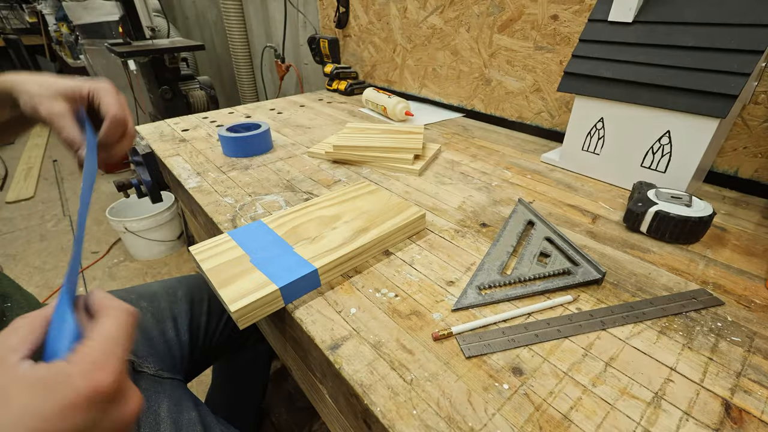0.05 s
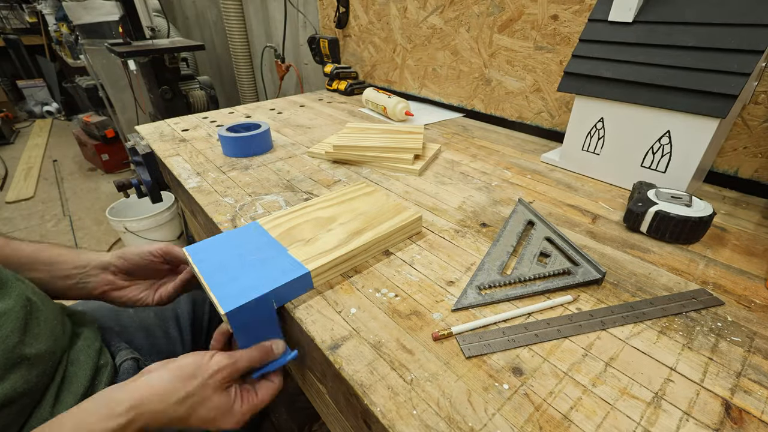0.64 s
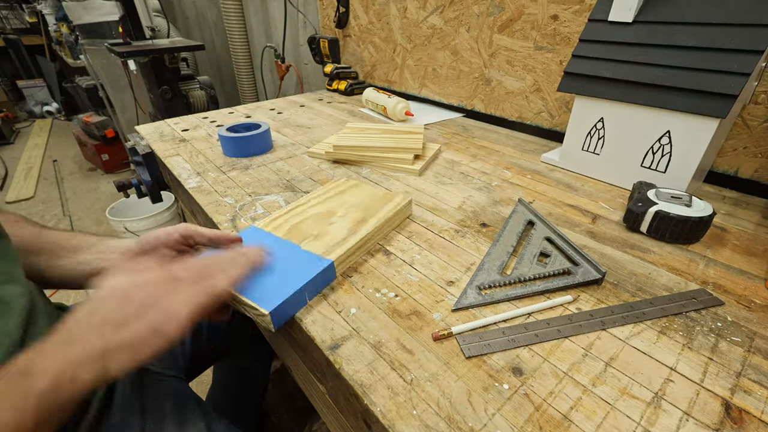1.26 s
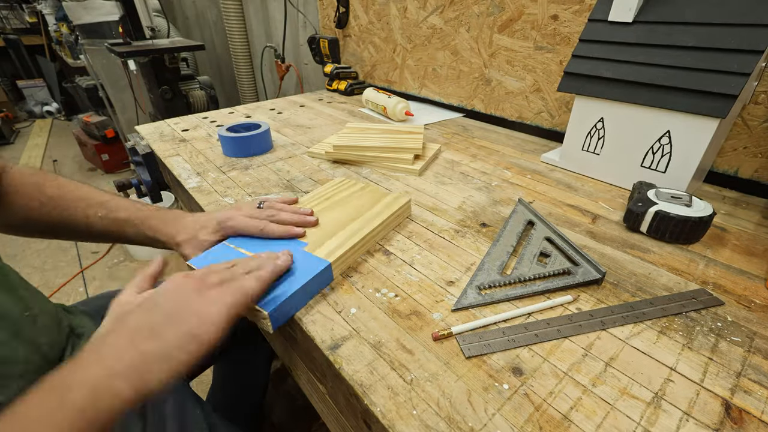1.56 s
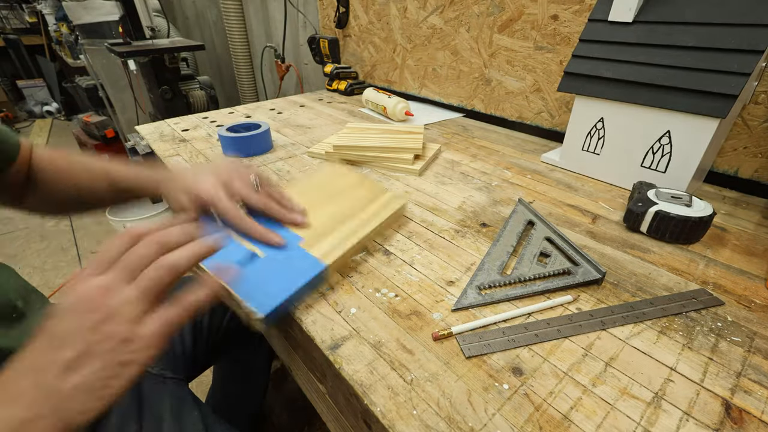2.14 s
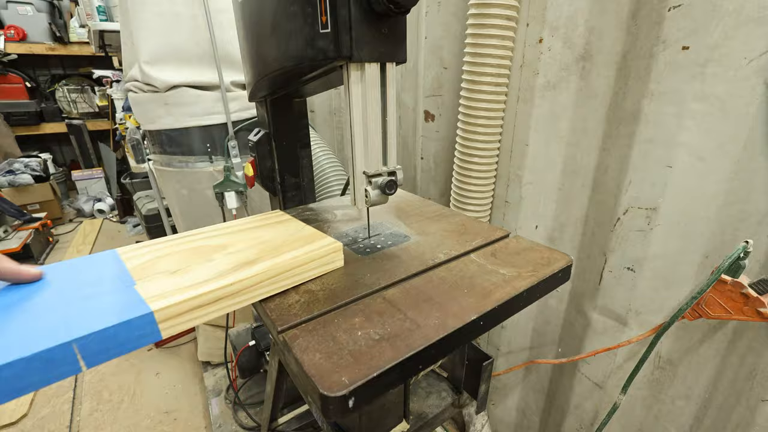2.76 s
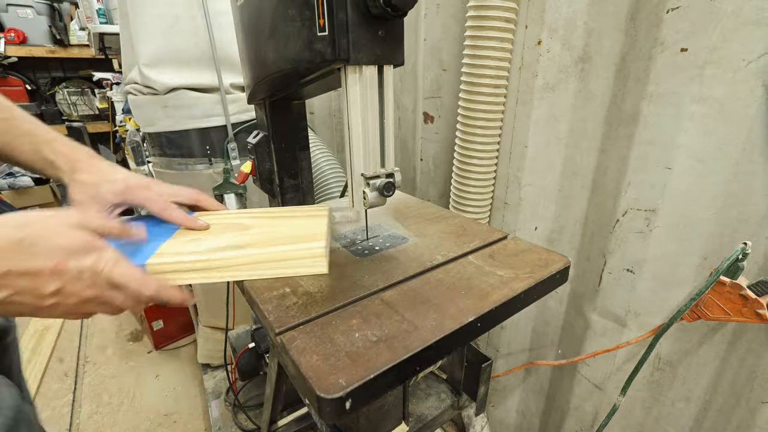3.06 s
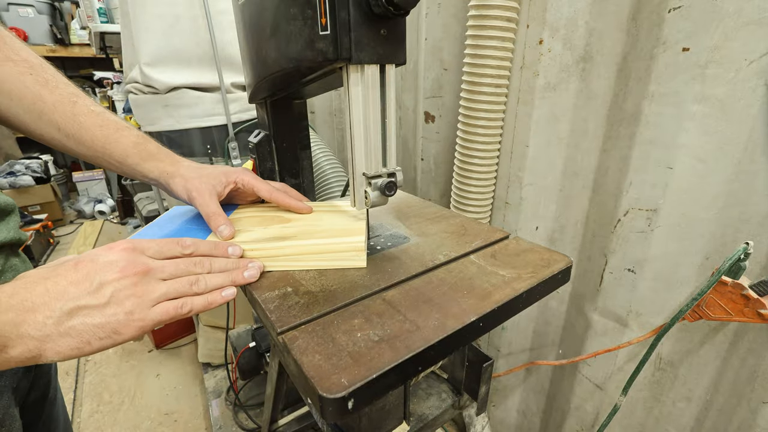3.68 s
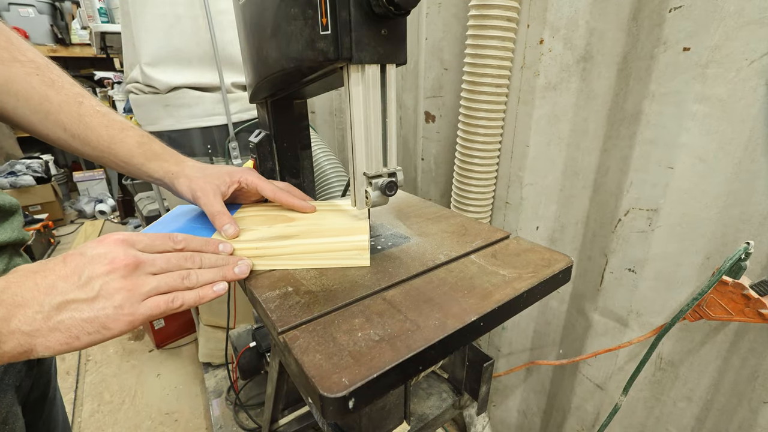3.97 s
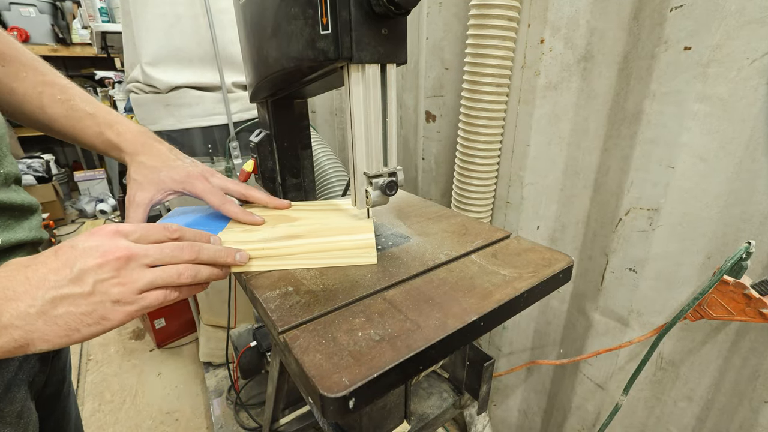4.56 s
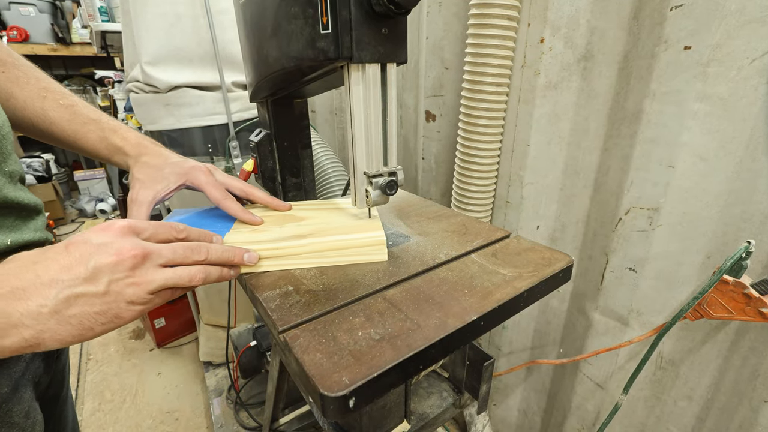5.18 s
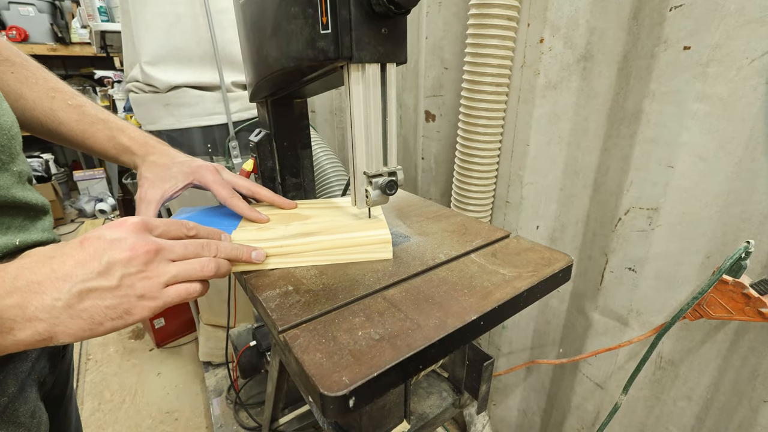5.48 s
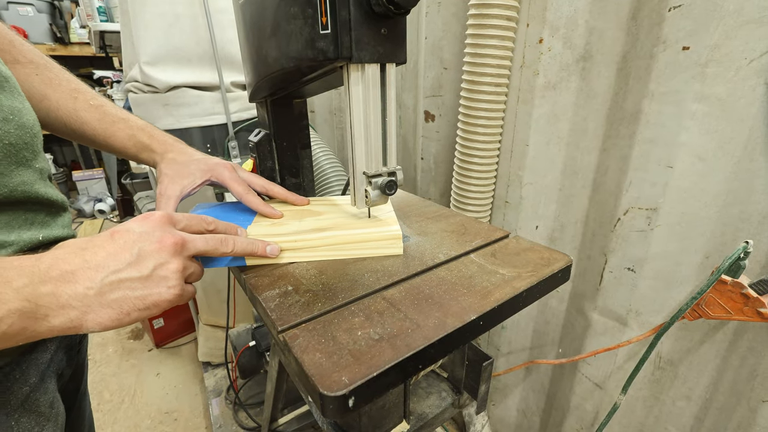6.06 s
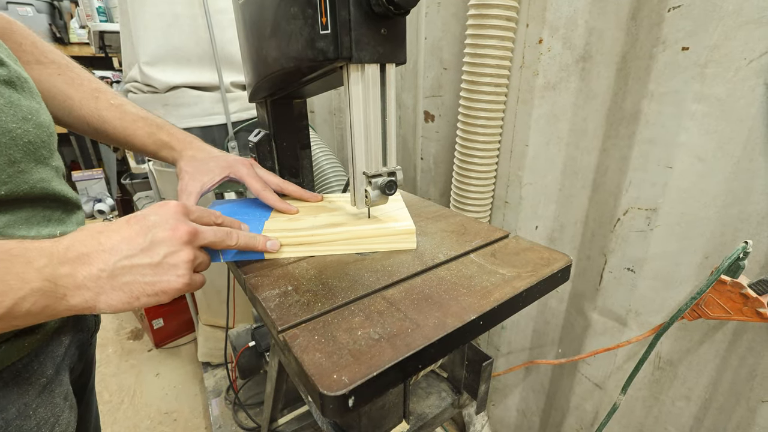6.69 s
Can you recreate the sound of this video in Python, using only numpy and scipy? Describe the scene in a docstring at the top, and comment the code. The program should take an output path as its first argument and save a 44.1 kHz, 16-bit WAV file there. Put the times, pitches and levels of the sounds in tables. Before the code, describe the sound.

Tape rustles and boards knock and scrape on a workbench before a bandsaw bites in with a raspy, metallic ring.

```python
"""In a small workshop, fingers smooth masking tape onto a stack of pine boards, which knocks and
slides on a workbench. Then the stack is pushed into a running bandsaw. The teeth chip the wood,
dust hisses and the saw table rumbles. The steel blade rings, and now and then it squeals as it
sticks in the cut. The room adds short echoes."""
import sys
import numpy as np
from scipy import signal
from scipy.fft import rfft, irfft, next_fast_len
from scipy.io import wavfile
from scipy.ndimage import uniform_filter1d, map_coordinates

SR = 44100
rng = np.random.default_rng(int(sys.argv[2]) if len(sys.argv) > 2 else 0)


def to_wav(s):
    """Save 16-bit WAV."""
    ch = np.atleast_2d(s).T  # columns
    pcm = np.round(np.clip(ch, -1, 1) * 32767)  # PCM
    wavfile.write(sys.argv[1], SR, pcm.astype(np.int16))


N = 301203
TIME = np.arange(N) / SR
AT_SAW_S, CUT_START_S, MID_CUT_S = 2.72, 2.972, 4.7


def from_db(db):
    """Turn decibels into a number to multiply by."""
    return np.exp(np.asarray(db) * (np.log(10) / 20))


def rms_one(x):
    """Scale a sound to an average power of 1."""
    return x / np.sqrt(np.mean(x ** 2) + 1e-20)


def at_hz(points, hz):
    """Read a table between its listed frequencies."""
    listed_hz, value = np.transpose(points)
    return np.interp(np.log(np.maximum(hz, 1)), np.log(listed_hz), value)


def coloured(x, colour):
    """Make some frequencies louder and others softer, at a total power of 1."""
    size = next_fast_len(N)
    gains = from_db(at_hz(colour, np.arange(size // 2 + 1) * SR / size))
    return rms_one(irfft(rfft(x, size) * gains, size)[:N])


def passed(x, hz, kind, order=2):
    """Keep the lows, the highs or a band of a sound."""
    return signal.sosfilt(signal.butter(order, np.clip(hz, 10, .45 * SR), kind, fs=SR, output="sos"), x)


def drift(per_s):
    """A random curve that wanders around zero."""
    points = rng.standard_normal(int(N / SR * per_s) + 3)
    return rms_one(np.interp(TIME * per_s, np.arange(len(points)), points))


def ring(x, hz, width):
    """Let x set one tone ringing; a smaller width (Hz) rings longer."""
    fade, turn = np.exp(-np.pi * width / SR), 2 * np.pi * hz / SR
    return signal.lfilter([0, np.sin(turn)], [1, -2 * fade * np.cos(turn), fade * fade], x + 1e-18)


def grains(per_s, spread_db):
    """Tiny random breaks or slips, as clicks of uneven size."""
    sizes = from_db(spread_db * np.minimum(rng.exponential(1, N), 4)) * rng.choice([-1, 1], N)
    return rms_one(sizes * (rng.random(N) < per_s / SR))


def contact(decay_s, size=8000):
    """A blow crushes wood fibres in a short burst of noise."""
    return rng.standard_normal(size) * np.exp(-np.arange(size) / (SR * decay_s))


def add(out, s, db, sound):
    """Place a blow so that its loudest 3 ms have the given level."""
    at = max(round(s * SR), 0)
    loudest = np.sqrt(uniform_filter1d(sound ** 2, size=132).max())
    out[at:at + len(sound)] += (from_db(db) * sound / loudest)[:N - at]


def onset(start_s, rise_s):
    """Rise from silence to 1."""
    return np.clip((TIME - start_s) / rise_s, 0, 1)


def gesture(start_s, length_s, db, rise_share=.19, sag_db_per_s=70, release_db_per_s=430):
    """Loudness of one rub or slide: it takes hold, eases off and lets go."""
    age = np.maximum(TIME - start_s, 0)
    level_db = db - sag_db_per_s * age - release_db_per_s * np.maximum(age - length_s, 0)
    return onset(start_s, rise_share * length_s) * from_db(np.maximum(level_db, -200))


def during_cut(rows):
    """A loudness curve that opens when the teeth meet the wood."""
    return from_db(np.interp(TIME, *np.transpose(rows))) * onset(CUT_START_S, 0.0027)


def swelling(peak_s, length_s, db):
    """Loudness that builds and dies away; its length is counted at half height."""
    return from_db(db) * .5 ** np.minimum((2 * (TIME - peak_s) / length_s) ** 2, 40)


def sustained(hz, width, even_s=0.15):
    """Uneven strokes keep a saw tone ringing: it flutters but holds its average level."""
    start = int(AT_SAW_S * SR)
    tone = ring(ring(rng.standard_normal(N - start), hz, width), hz, width * 6)
    level = np.sqrt(np.abs(uniform_filter1d(tone ** 2, int(even_s * SR))) + 1e-9)
    return np.pad(tone / level, (start, 0))


def background():
    """Still air and electric hum at the bench give way to the swish of the running blade."""
    # hum of the power supply: (frequency [Hz], level [dB])
    hum_tones = [(301.0, -66), (453.5, -65), (908.0, -67.5)]
    # tone colours of the air and the free-running blade: (frequency [Hz], level [dB])
    air_colour = [(18, -98), (30, -61), (240, -18), (296, -22), (404, -14), (448, -7.5), (597, -15.5),
                  (928, -20), (1000, -24), (2920, -21.5), (15000, -46)]
    idle_colour = [(100, -39), (400, -13), (1200, -6.5), (3000, -6.5), (6000, -11), (15000, -17)]
    at_saw = onset(AT_SAW_S, 0.056)
    hum = sum(from_db(db - 3) * np.sin(2 * np.pi * hz * TIME) for hz, db in hum_tones)
    hum *= from_db(2 * drift(6))
    air = from_db(-62.5) * coloured(rng.standard_normal(N), air_colour)
    idle = from_db(-58) * coloured(rng.standard_normal(N), idle_colour)
    return (1 - at_saw) * (hum + air) + at_saw * idle


def tape_strokes():
    """Skin sticks and slips on crinkly tape, in clumps of tiny clicks that make the boards ring."""
    # finger strokes: (start [s], length [s], level [dB])
    strokes = [(0.0, 0.06, -52), (0.04, .085, -42.5), (0.12, 0.13, -49.5), (0.632, 0.041, -60),
               (0.752, .06, -63), (0.87, 0.026, -56), (1.01, .07, -62), (1.106, 0.033, -49.5),
               (1.172, 0.12, -55), (1.32, 0.019, -48), (1.364, .04, -43), (1.425, 0.051, -47),
               (1.56, 0.21, -50.5), (1.917, 0.052, -47.5), (2.022, 0.09, -44.5), (2.132, 0.035, -45),
               (2.2, 0.028, -30), (2.78, .17, -61)]
    # tone colour of skin on tape: (frequency [Hz], level [dB])
    rustle = [(80, -37), (300, -12), (1200, -10.5), (1800, 1.5), (4000, -3.5), (8000, 1.5), (12000, 0),
              (15500, 2.5)]
    crinkle = rms_one(from_db(4.5 * np.tanh(drift(60))))
    crackles = from_db(-8) * grains(200, spread_db=2.5)
    skin = coloured(grains(4500, spread_db=3) * crinkle + crackles, rustle)
    boards = from_db(-15) * rms_one(ring(skin, 1830, 40))
    pressure = sum(gesture(*row, rise_share=.3, sag_db_per_s=44, release_db_per_s=400) for row in strokes)
    return from_db(2) * pressure * (skin + boards)


def snaps(creak_samples=400):
    """Tape, fingernails and wood edges creak briefly as they start to give, then click."""
    # sharp clicks: (time [s], level [dB], centre frequency [Hz])
    clicks = [(0.236, -34, 5540), (0.3098, -40.5, 11000), (0.7164, -28.5, 3220), (0.8599, -29, 8750),
              (0.9973, -41.5, 2510), (1.091, -20, 13000), (1.372, -34, 13600), (1.4693, -30.5, 3620),
              (1.517, -9.5, 8500), (1.919, -33.5, 4630), (2.006, -30.5, 2680), (2.2748, -9.5, 6340),
              (2.2958, -15, 2940), (2.468, -24, 6840), (2.5428, -24.5, 7130), (2.9117, -32, 2990),
              (2.9799, -13.5, 4200)]
    out = np.zeros(N)
    for s, db, hz in clicks:
        creak = rng.standard_normal(creak_samples) * np.linspace(0, 1, creak_samples)
        click = np.concatenate([from_db(-19 - (db + 20) / 2) * creak, contact(0.0014)])
        tone = passed(click, [hz * 0.44, hz * 1.4], "band", order=1)
        body = from_db(-12) * passed(click, 740, "high")
        add(out, s - creak_samples / SR, db, tone + body)
    return out


def knocks():
    """The stack hits bench or saw table: a thud whose pitch depends on the grip, a crack and a ring."""
    # knocks: (time [s], level [dB], thud pitch [Hz], hardness [dB])
    hits = [(0.717, -37, 490, -7), (0.873, -29, 583, -2), (1, -27.5, 510, -1), (1.124, -32, 630, 8),
            (1.211, -37, 530, -15), (1.224, -29.5, 603, -12), (1.257, -27, 517, -9),
            (1.296, -31.5, 480, -19), (1.319, -37, 550, -24), (1.361, -25.5, 590, 2), (1.4, -23.5, 573, -3),
            (1.438, -24, 583, 2), (1.506, -23, 552, -9), (1.585, -21.5, 970, 9), (1.968, -31.5, 653, -4),
            (2.01, -23.5, 495, 15), (2.207, -30.5, 550, -28), (2.244, -28.5, 533, 6),
            (2.273, -23.5, 577, 9), (2.299, -17, 526, 11), (2.344, -25, 1050, 11), (2.398, -14, 815, -7),
            (2.46, -33, 850, 9), (2.723, -36, 820, -36), (2.798, -41, 494, -24), (2.878, -36, 625, -2),
            (2.905, -21, 1210, -8)]
    # ringing tones of the stack: (frequency [Hz], level [dB], time to fade by 60 dB [s])
    wood_tones = [(529, -1.5, 0.079), (996, -2, 0.12), (1310, 5.5, 0.044), (1594, -7, 0.059),
                  (1823, -0.5, 0.21), (2322, -11, 0.12), (2800, -4, 0.031)]
    out = np.zeros(N)
    for s, db, thud_hz, hardness in hits:
        blow = contact(.0015)
        push = passed(signal.unit_impulse(len(blow)), 2250, "low")
        thud = passed(ring(push, thud_hz, width=80), .65 * thud_hz, "high", order=4)
        crack = passed(contact(0.0069), [650, 2400], "band", order=3)
        grip = 1 + .012 * rng.standard_normal(len(wood_tones))
        wood = sum(from_db(level) * ring(blow, hz * shift, np.log(1000) / (np.pi * fade_s))
                   for (hz, level, fade_s), shift in zip(wood_tones, grip))
        clack = rms_one(passed(wood, 340, "high", order=4)) + from_db(-0.5) * rms_one(crack)
        add(out, s, db, rms_one(thud) + from_db(-1 + 0.36 * hardness) * clack)
    return out


def bumps():
    """The heavy bench top answers a push with a dull bump."""
    # pushes on the bench: (time [s], level [dB])
    pushes = [(1.361, -71), (1.512, -62), (2.273, -43.5), (2.461, -58)]
    bump = passed(passed(signal.unit_impulse(8000), 130, "low"), 25, "high", order=1)
    out = np.zeros(N)
    for s, db in pushes:
        add(out, s, db, bump)
    return out


def slides():
    """Wood sticks and slips on wood, so the stack scrapes and rings; once, an edge rasps."""
    # slides on the bench: (start [s], length [s], level [dB])
    moves = [(1.524, 0.05, -27.5), (1.697, 0.0096, -51), (2.287, 0.07, -22.5), (2.39, 0.017, -30),
             (2.45, .03, -35.5), (2.558, 0.027, -33.5), (2.899, .06, -41)]
    # tone colour of wood on wood: (frequency [Hz], level [dB])
    scrape = [(50, -49), (150, -19.5), (480, 0.5), (760, -0.5), (1300, 0.5), (1850, 1), (3200, 5),
              (4200, -0.5), (8000, -6), (13000, -10.5)]
    slips = coloured(grains(4000, spread_db=2.5), scrape) * from_db(2.6 * np.tanh(drift(90)))
    wood = slips + from_db(-7.5) * rms_one(ring(slips, 1878, 45))
    edge = rms_one(passed(grains(1500, spread_db=0.5), [2960, 3560], "band"))
    rasp = gesture(start_s=2.203, length_s=0.058, db=-33) * (edge + from_db(-14.5) * wood)
    return from_db(-3.5) * sum(gesture(*row) for row in moves) * wood + rasp


def chips(bite):
    """The teeth break off thousands of tiny chips a second."""
    # tone colour of chipping: (frequency [Hz], level [dB])
    chip_colour = [(300, -32.5), (490, -20), (590, -7.5), (720, -18), (880, -14.5), (1000, 0.5), (1250, 9),
                   (1450, 2.5), (1650, 8), (2000, -5), (3300, -3.5), (4200, -6), (6500, -7.5),
                   (12000, -4.5)]
    return from_db(-33) * bite ** 0.64 * coloured(grains(9000, spread_db=3), chip_colour)


def sawdust(bite, buried_s=3.82):
    """Flying dust hisses in a wide cloud, and the blade's scraping shifts between its high tones."""
    # tone colours of coarse and fine dust: (frequency [Hz], level [dB])
    coarse_colour = [(3000, -36.5), (6500, -17), (7600, 4.5), (9000, -4.5), (11400, 6), (13000, 2),
                     (15700, -6)]
    fine_colour = [(9000, -35), (12500, -14), (14500, -4), (15300, 5)]
    # high tones of the blade and its guides:
    # (frequency [Hz], width [Hz], mid-cut level [dB], change as the cut deepens [dB/s])
    guide_tones = [(5514, 140, -14, -1), (8500, 170, -12, -1.5), (9290, 150, -13.5, -2),
                   (10260, 260, -9, 2), (11990, 130, -12, 1.5)]
    coarse = from_db(-35.5) * bite ** 0.66
    buried = onset(buried_s, 0.058)  # the highest hiss swells once the blade is buried, then fades
    fine = buried * from_db(-28.5 - 5 * (TIME - buried_s)) + (1 - buried) * from_db(-40) * bite
    scraping = 0
    for hz, width, db, slope in guide_tones:
        level_db = db + slope * (TIME - MID_CUT_S) + 2.5 * np.tanh(drift(3.01))
        scraping += from_db(level_db) * sustained(hz, width)
    middle, side = [coarse * coloured(grains(14000, spread_db=3), coarse_colour)
                    + fine * coloured(grains(14000, spread_db=4.5), fine_colour) for _ in range(2)]
    spread = from_db(-12) * side * np.array([[1], [-1]])
    return passed(middle + coarse * scraping + spread, 1500, "high")


def blade(bite):
    """Teeth keep the blade ringing; its two strongest groups of tones swell as wood presses its side."""
    # tones of the tight blade: (frequency [Hz], level [dB])
    blade_tones = [(635.2, -61), (802.1, -61.5), (1082, -59), (1179, -38.5), (1303, -45.5), (1346, -47),
                   (1394, -52), (1475, -52.5), (1620, -36.5), (1663, -37.5), (1728, -49), (1803, -50.5),
                   (1884, -62), (2105, -55.5), (2428, -52.5), (2503, -54), (2659, -58), (2880, -52.5),
                   (2961, -50.5), (2998, -47.5), (3106, -59.5), (3198, -55), (3241, -52.5), (3321, -53.5),
                   (3499, -53), (3548, -58.5), (3650, -50.5), (3871, -60), (4517, -51.5), (4597, -54.5)]
    # strength of the ring near 1200 Hz and near 1650 Hz: (time [s], level [dB])
    lower_ring = [(2.99, -40), (3.14, -31.5), (3.62, -43.5), (3.98, -37), (4.08, -51), (4.16, -36.5),
                  (4.44, -40), (4.87, -35.5), (5.26, -48.5), (5.28, -38.5), (6.61, -30.5), (6.8, -32)]
    upper_ring = [(2.99, -44), (3.03, -23), (3.11, -37), (3.28, -30.5), (3.32, -29), (3.5, -33),
                  (4.01, -27.5), (4.05, -39.5), (4.53, -33.5), (4.61, -46), (4.67, -31), (4.8, -28),
                  (5.35, -37.5), (5.53, -30.5), (6.39, -33), (6.42, -27), (6.78, -34.5), (6.8, -26.5)]
    lower, upper = during_cut(lower_ring), during_cut(upper_ring)
    out = np.zeros(N)
    for hz, db in blade_tones:
        drive = lower if 1120 < hz < 1230 else upper if 1570 < hz < 1760 else bite
        if hz > 2300:  # high tones follow both teeth and side pressure, and waver in level
            drive = bite ** 1.1 * upper ** 0.25 * from_db(2 * drift(3.01))
            db += 1
        swell = drive / np.sqrt(np.mean(drive[TIME > 3.2] ** 2))
        out += from_db(db) * swell * sustained(hz, min(hz / 240, 9))
    return out * from_db([[-.6], [.6]])  # a little louder on the right


def chatter(bite):
    """The blade chatters as it enters the edge of the wood, then settles."""
    # tones that the first bite sets off: (frequency [Hz], width [Hz], level [dB])
    entry_tones = [(1860, 10, -32), (2864, 16, -35), (3235, 100, -29), (3574, 20, -32), (4553, 23, -30),
                   (8750, 90, -34)]
    entry = swelling(peak_s=3.1, length_s=0.1, db=2.2) * onset(CUT_START_S, .01)
    settled = from_db(-16.5) * bite ** 0.48
    return (entry + settled) * sum(from_db(db) * sustained(hz, width) for hz, width, db in entry_tones)


def squeals(sag_share_per_s=.003):
    """The blade sticks in the cut and squeals, slowly sinking in pitch; one squeak is a bit lower."""
    # moments of sticking: (peak time [s], length [s], level [dB])
    swells = [(4.044, 0.073, -25), (4.16, .14, -29.5), (4.45, .11, -34), (4.857, .14, -32.5),
              (5.277, 0.1, -33), (5.597, 0.32, -39.5), (5.851, 0.26, -27.5)]
    # tones of the squeal: (frequency [Hz], width [Hz], level [dB])
    squeal_tones = [(11114, 48, 1), (3340, 2.7, -16)]
    faint = from_db(-37.5) * onset(CUT_START_S, 0.22)
    sticking = faint + sum(swelling(*row) for row in swells)
    tone = sum(from_db(db) * sustained(hz, width, even_s=0.077) for hz, width, db in squeal_tones)
    read_s = TIME - sag_share_per_s * (TIME - MID_CUT_S) ** 2 / 2  # reading slower lowers the pitch
    sinking = map_coordinates(tone, [read_s * SR], order=5)
    squeak = swelling(peak_s=6.09, length_s=.16, db=-35) * sustained(9850, 110)
    return sticking * sinking + squeak


def table_rumble(bite, lies_flat_s=3.18):
    """Once the stack lies flat, the teeth shake the saw table through it."""
    # tone colour of the shaking table: (frequency [Hz], level [dB])
    rumble = [(20, -7), (60, -11), (110, 1), (135, 13), (170, -4), (300, 5.5), (600, -5), (1500, -34)]
    shake = from_db(-76) * bite ** 1.3 * onset(lies_flat_s, .04)
    return shake * coloured(rng.standard_normal(N), rumble) * from_db(2.8 * drift(28))


def shop(x, echo_db, side_db, size=26000):
    """Add the room's echoes, which die away band by band; mostly their highs differ between the ears."""
    # length of the echoes: (frequency [Hz], time to fade by 60 dB [s])
    fade_times = [(200, 0.12), (800, 0.26), (2000, 0.42), (5500, 0.28), (14000, 0.066)]
    # how much the echoes differ between the ears: (frequency [Hz], level [dB])
    ear_spread = [(200, -21), (550, -17), (1200, -4.5), (2500, -1.5), (5000, -2.5), (9500, -6.5),
                  (13000, 7)]
    t, hz = np.arange(size) / SR, np.arange(size // 2 + 1) * SR / size
    noise = rfft(rng.standard_normal((2, size)))
    noise[1] *= from_db(at_hz(ear_spread, hz))
    edges = np.geomspace(200, SR / 2, 29)
    echoes = 0
    for low, high in zip(edges, edges[1:]):
        band = irfft(noise * ((hz >= low) & (hz < high)), size)
        echoes += band * np.exp(-np.log(1000) * t / at_hz(fade_times, np.sqrt(low * high)))
    echoes *= np.clip(t / 0.0092, 0, 1)
    middle, side = from_db([[echo_db], [echo_db + side_db]]) * echoes / np.sqrt(np.sum(echoes[0] ** 2))
    ears = np.array([middle + side, middle - side])
    return x + signal.oaconvolve(np.atleast_2d(x), ears, axes=1)[:, :N]


def scene():
    """Taping at the bench, then the cut, all in one room."""
    # how hard the teeth bite as the hands feed the stack: (time [s], level [dB])
    feed = [(2.99, -46), (3.04, -33), (3.19, -36), (3.67, -35.5), (4.05, -39), (4.19, -43), (4.42, -42),
            (5.56, -41.5), (5.65, -41), (6.23, -40.5), (6.29, -40), (6.8, -39.5)]
    bite = during_cut(feed) / from_db(-38.5)  # 1 is a usual bite
    judder = from_db(drift(60))
    handling = background() + from_db(0.8) * (tape_strokes() + slides()) + from_db(-6) * knocks()
    bench = shop(handling, echo_db=-6, side_db=-2.5) + from_db(3.5) * bumps()
    clicks = shop(from_db(-7.5) * snaps(), echo_db=-3.5, side_db=-4.5)
    cutting = shop(judder * chips(bite), echo_db=-2.5, side_db=-8)
    dust = from_db(2) * judder * sawdust(bite)
    steel = from_db(3) * blade(bite) + from_db(-2.16) * (chatter(bite) + squeals())
    return bench + clicks + cutting + dust + shop(steel, echo_db=-18, side_db=8) + table_rumble(bite)


def record(dry, cutoff_hz=15780):
    """Cut away the very highest sounds."""
    return signal.sosfilt(signal.ellip(12, .1, 90, cutoff_hz, fs=SR, output="sos"), dry)


dry = scene()
out = record(dry)
to_wav(out)
```